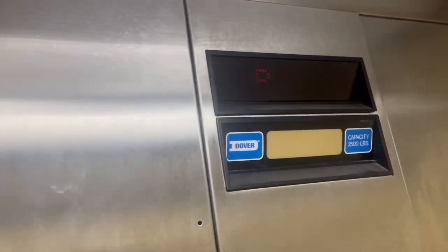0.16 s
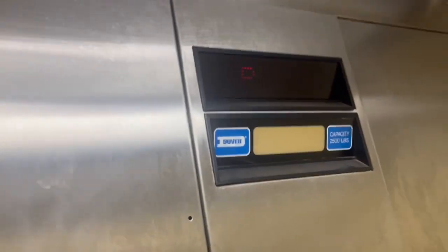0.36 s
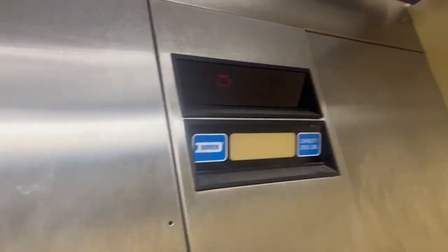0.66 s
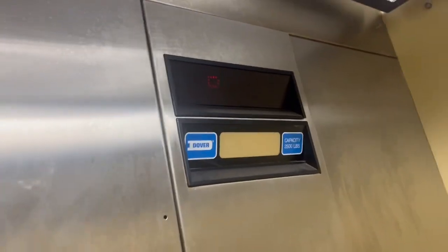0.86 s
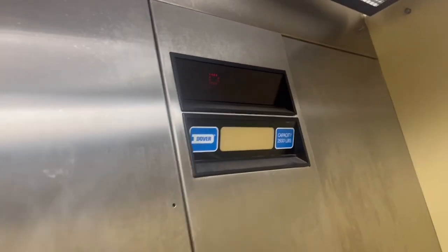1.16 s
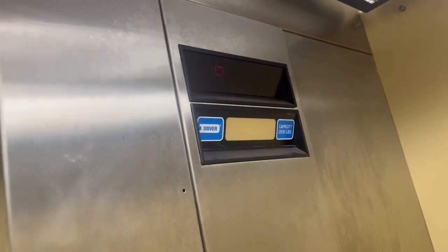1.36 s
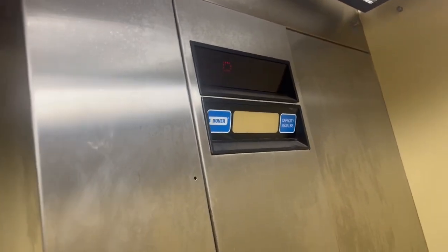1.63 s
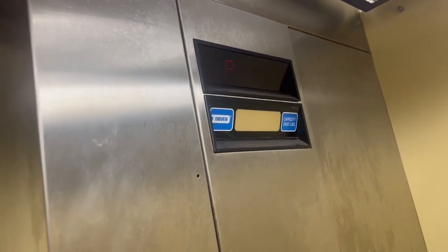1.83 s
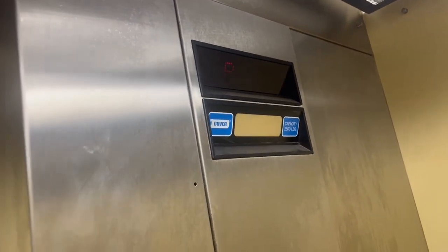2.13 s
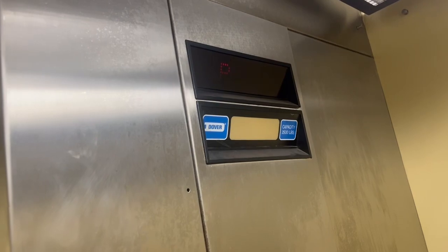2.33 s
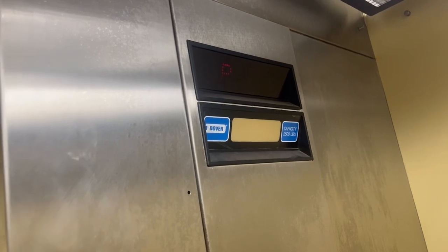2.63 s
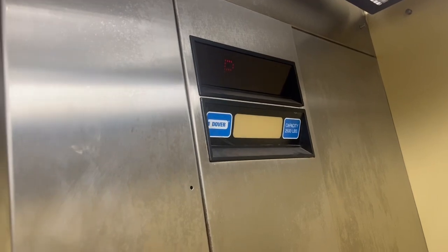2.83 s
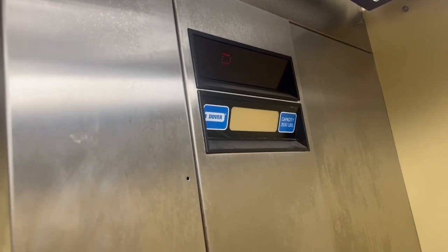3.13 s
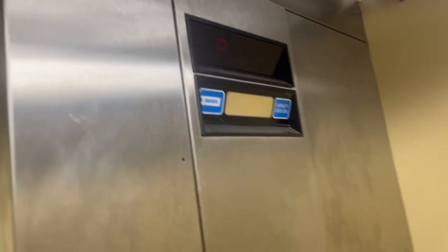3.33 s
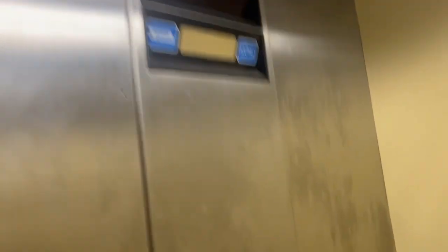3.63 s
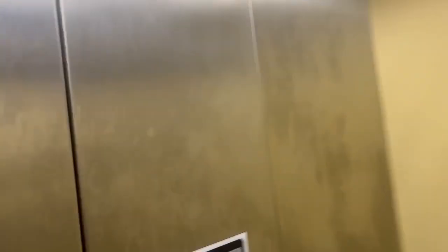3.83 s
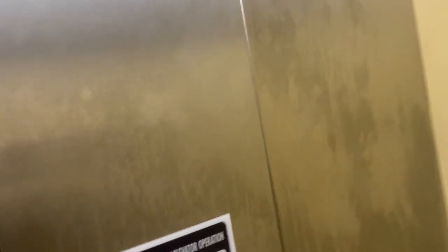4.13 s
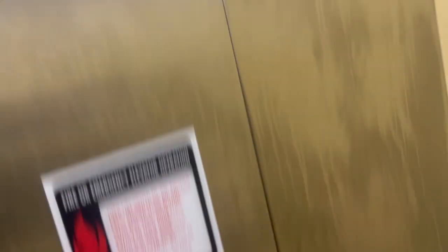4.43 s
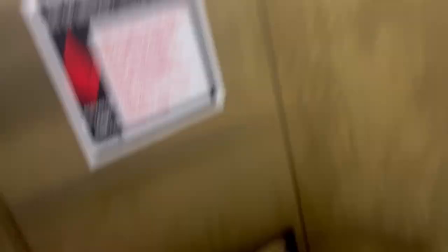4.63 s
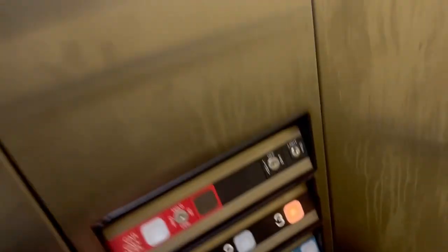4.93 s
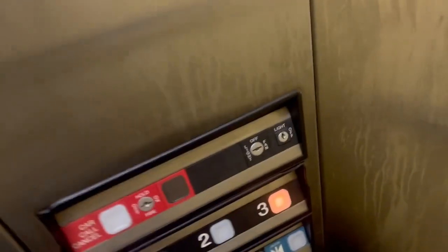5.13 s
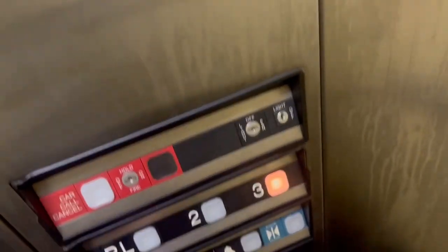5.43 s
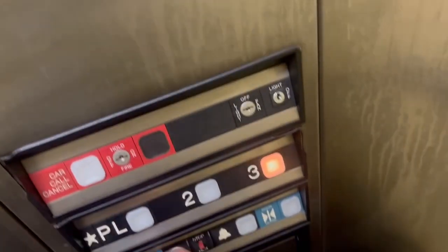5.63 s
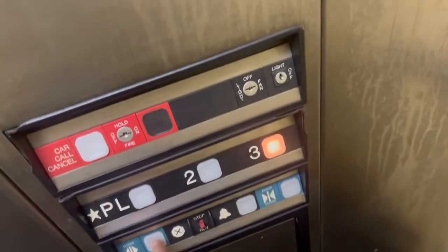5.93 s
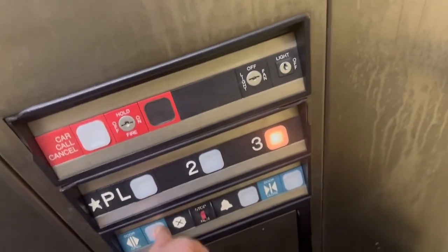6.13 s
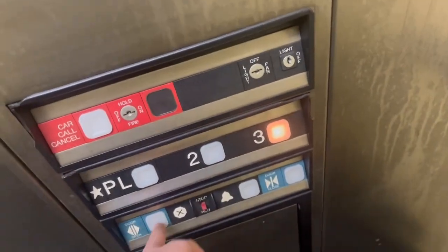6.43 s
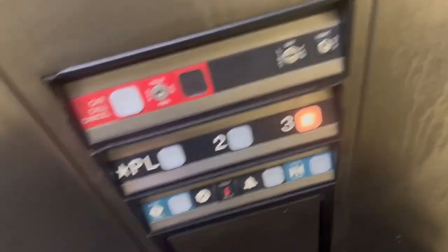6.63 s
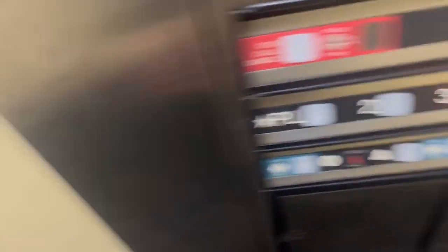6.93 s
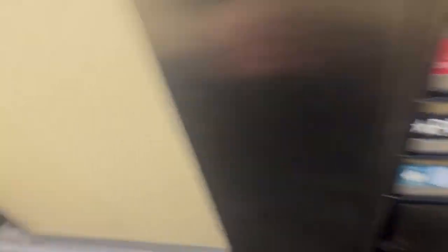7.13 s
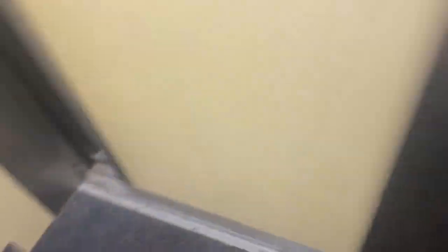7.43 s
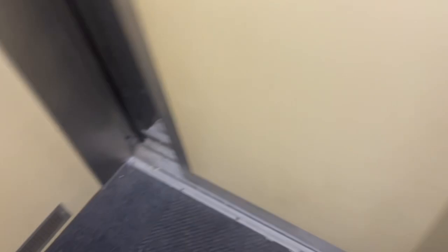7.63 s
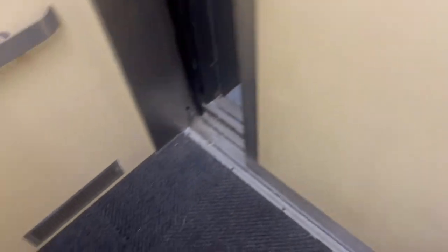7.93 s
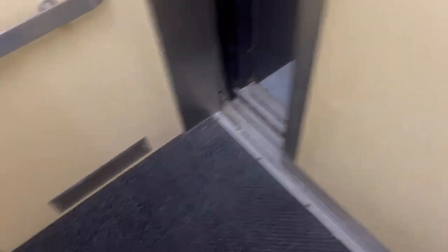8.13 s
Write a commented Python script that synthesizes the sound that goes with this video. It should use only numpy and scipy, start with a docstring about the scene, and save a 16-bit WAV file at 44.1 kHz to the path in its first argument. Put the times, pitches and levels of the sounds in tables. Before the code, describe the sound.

Inside a humming elevator, someone shuffles and steps heavily, then a button clicks and the door jolts and rumbles open.

```python
"""An electric motor hums inside a steel elevator car, on many multiples of its shaft speed, over a bed of
rushing air and low rumble. A passenger carries a microphone through the car's standing waves, so each tone
swells and fades. Soles scuff, steps boom in the floor, sleeves rustle and a button clicks; then the door drive
jolts, groans and rumbles while the rollers rub."""
import sys
import numpy as np
from scipy.fft import rfft, irfft, next_fast_len
from scipy.io import wavfile
from scipy.ndimage import map_coordinates

SR = 44100
rng = np.random.default_rng(int(sys.argv[2]) if len(sys.argv) > 2 else 0)


def generate_wav(sig):
    """Save sig (samples, or channels by samples) to the path in sys.argv[1] as 16-bit PCM at SR."""
    pcm = np.round(np.clip(np.atleast_2d(sig).T, -1, 1) * 32767).astype(np.int16)
    wavfile.write(sys.argv[1], SR, pcm)


N = 364266

# Microphone path: 0 near the display, 1 a step back, 2 lowered, 3 at the buttons, 4 facing the door
# (time [s], place [0-4])
MIC_PATH = [(0, 0), (.75, 0.5), (.95, 1), (3.72, 1), (3.88, 2), (4.3, 2), (4.6, 2.5), (5.1, 3), (6.8, 3),
            (7.15, 3.5), (7.45, 4.5), (8.26, 4)]
# Notches in the treble (frequency [Hz], mid gain [dB], side gain [dB])
TREBLE_NOTCH_EQ = [(6770, 0, 1.5), (7510, -5.5, 6), (7870, -40.5, -9), (8600, -31, -2), (9580, -7, 4),
                   (10500, -5, -10), (11200, -5.5, -31), (13200, -5, -16.5), (14000, -8, -2), (14500, -34, -5),
                   (16000, -34, -2)]
# The microphone's lean to the left (frequency [Hz], left over right [dB])
LEFT_LEAN = [(60, -.5), (150, 0), (400, 1), (1200, 0), (2250, .3), (4100, 5), (7000, 4), (9000, 0),
             (16000, 0)]

# Fader ride on the air bed (time [s], relative level [dB])
AIR_RIDE = [(0.0, -39.5), (1.1, -39.5), (3.4, -39), (4.8, -41), (7, -40.5), (8.26, -40.5)]
# Colour of the air in the centre (frequency [Hz], gain [dB])
AIR_MID_EQ = [(20, 0), (45, 19.5), (80, 16), (130, 6), (250, 7.5), (450, 11.5), (700, 7), (1000, 8.5),
              (1450, 4.5), (1800, -2), (3000, -8.5), (5000, -16), (7000, -29), (12000, -32.5), (16000, -36)]
# Colour of the air's stereo width (frequency [Hz], gain [dB])
AIR_SIDE_EQ = [(20, -26.5), (60, -6.5), (130, -5), (250, 2), (450, 1), (700, 9), (1000, 6), (1450, 5.5),
               (1800, -7), (3000, -11.5), (5000, -18.5), (8000, -33.5), (16000, -32)]
# Car rumble with the microphone high (frequency [Hz], relative level [dB])
RUMBLE_HIGH_EQ = [(20, -19), (45, -6.5), (80, 0), (130, -12.5), (200, -8), (300, -13), (450, -12.5),
                  (700, -38), (1200, -85)]
# Car rumble with the microphone low (frequency [Hz], relative level [dB])
RUMBLE_LOW_EQ = [(20, -18), (45, -1), (80, 1.5), (130, -2), (200, -3), (300, -7.5), (450, -18.5),
                 (700, -27.5), (1200, -84)]
# Weight of the rumble (microphone high [dB], microphone low [dB])
RUMBLE_LEVELS = [-40.5, -38]
# Width of the rumble (frequency [Hz], side against mid [dB])
RUMBLE_WIDTH = [(40, -25), (130, -17.5), (300, -8), (600, -4)]

# Colour of brushing cloth (frequency [Hz], relative level [dB])
CLOTH_EQ = [(700, -36), (2000, 7.5), (4000, 0.5), (7000, -4), (12000, -2.5), (16000, -11.5)]
# Sleeve moves (peak time [s], level [dB], rise [s], fall [s], gain below 8 kHz [dB])
SLEEVE_MOVES = [(.08, -62, 0.11, 0.1, -3), (.295, -46.5, 0.01, 0.036, -4.5), (.53, -59.5, 0.091, .08, -3.5),
                (.77, -51.5, 0.016, 0.031, 0), (1.3, -64.5, 0.33, 0.16, -3), (3.64, -56, 0.065, .08, -2),
                (4.2, -70.5, 0.59, .2, -9), (4.73, -61, 0.034, 0.055, -1), (4.92, -58, .07, 0.087, -2),
                (5.17, -65, 0.04, .04, -8), (5.419, -62, 0.087, 0.14, -4), (5.752, -60, 0.037, .02, -3),
                (6.111, -52.5, .05, 0.04, -2.5), (6.7, -54, 0.18, 0.12, -6), (6.97, -63.5, 0.068, 0.11, 1),
                (8.15, -60, 0.51, 0.25, -5)]
# Colour of a dragging sole (frequency [Hz], relative level [dB])
SOLE_EQ = [(500, -3), (1200, -3), (2000, -6), (4000, -11.5), (7000, -24.5), (12000, -30), (16000, -20)]
# Soles on the mat (start [s], level [dB], rise [s], fall [s])
SOLE_DRAGS = [(0.281, -40, 0.034, 0.053), (0.739, -37.5, 0.047, 0.045)]
# Rubs of sole, door guide and rollers (peak time [s], level [dB], rise and fall [s], pitch [Hz], width [Hz])
RUBS = [(.775, -51, .012, 2880, 120), (.808, -42.5, .011, 2040, 110), (.817, -42, 0.016, 2520, 110),
        (6.19, -57, .2, 1750, 2000), (6.13, -50, .08, 1370, 220), (5.8, -50, .08, 1350, 100),
        (6.15, -56.5, .07, 2050, 300), (6.52, -42, 0.034, 1420, 400), (7.33, -52, .06, 1410, 100),
        (6.45, -60, .15, 2400, 400), (6.9, -58, .1, 2600, 300), (7.1, -58.5, .06, 2350, 190),
        (7.55, -58, 0.2, 2420, 270), (8.05, -57.5, .15, 2400, 300)]
# Weight landing on the floor (time [s], level [dB], pitch [Hz], t60 [s])
FOOTFALLS = [(.362, -21.5, 68.7, 0.22), (.53, -28, 73, 0.26), (.77, -21.5, 74.7, 0.24), (.4, -26, 48, .3),
             (1.95, -33, 50, .25), (2.06, -31.5, 70, .2), (3.785, -16, 71.8, 0.4), (3.8, -29, 168, .25),
             (3.822, -20, 80, .35), (4.97, -28, 54.9, .15)]
# Button and door contacts (time [s], relative level [dB], crack t60 [s])
CONTACTS = [(4.698, -46, 0.061), (5.5029, -44, 0.076), (4.777, -49.5, .02), (5.7503, -46, .01),
            (5.7543, -27, 0.025), (5.7578, -38, .02), (6.12, -37, 0.039), (6.424, -42.5, 0.04)]
# Colour of a click on the steel panel (frequency [Hz], relative level [dB])
PANEL_EQ = [(400, -8), (1000, 8.5), (2500, -1), (5000, -8), (10000, -10.5), (16000, -15.5)]
# Ring of a clicked part (frequency [Hz], relative level [dB], t60 [s])
BUTTON_MODES = [(900, 22, .007), (2500, -6, .07), (3300, 0, 0.035), (6850, -9, .02), (11300, 16, 0.006)]
# Resonances of door and frame (frequency [Hz], width [Hz], relative level [dB])
DOOR_BODY = [(50, 30, -4.5), (98, 32, -0.5), (130.4, 52, 2), (179.4, 59, -2.5), (286.6, 49, -12.5),
             (352, 40, -13), (470, 120, -17)]
# The door takes up its slack and knocks in its track (time [s], level [dB], pitch [Hz], t60 [s])
DOOR_KNOCKS = [(6.045, -21.5, 152.7, .3), (6.055, -21, 210.2, 0.4), (6.115, -24, 214, .45),
               (6.11, -28, 290, .4), (6.045, -25, 285, 0.4), (6.118, -11.5, 132.8, 0.22),
               (6.135, -19, 96.3, 0.27), (6.13, -18, 50, .35), (6.22, -23, 78, 0.46),
               (6.29, -20.5, 94, 0.45), (6.32, -18.5, 52, .45), (6.38, -19.5, 72, 0.35),
               (6.43, -29.5, 276, .3), (6.555, -20, 143, 0.3), (6.66, -21, 75.2, 0.38)]
# A sagging boom after the jolt (time [s], pitch [Hz], level [dB])
GROAN_GLIDE = [(0, 180, -70), (6.16, 180, -70), (6.22, 176, -30), (6.32, 140, -29), (6.42, 124, -28),
               (6.55, 120, -32), (6.7, 118, -70), (8.26, 118, -70)]

# Motor speed, sagging once the door drive runs (time [s], shaft rate [Hz])
SHAFT_SPEED = [(0, 24.17), (6.7, 24.17), (7.3, 24.09), (8.26, 24.05)]
# Core tones of the hum (pitch [x shaft rate])
CORE_MULTIPLES = [2, 3, 4, 5, 6, 8, 9, 12, 15, 16, 22, 24, 44, 28]
# One row per core tone (mid at each of places 0-4 [dB], side held high [dB], side held low [dB])
CORE_LEVELS = [(-42.5, -46, -44, -40, -42, -70, -64), (-33.5, -31, -38, -34, -49.5, -51, -51.5),
               (-40.5, -40.5, -52, -44, -43.5, -57, -54.5), (-53, -45.5, -51.5, -44.5, -42, -55.5, -58),
               (-50, -54.5, -40, -35.0, -38, -62, -59.5), (-46, -46.5, -70, -39, -40.0, -66.5, -75),
               (-42.5, -41, -37.5, -40, -46.5, -59, -52.5), (-53, -56.5, -66, -68, -69, -69, -61),
               (-59, -50.5, -60, -51, -53.5, -71, -72), (-60, -57.5, -65, -58, -53.5, -66.5, -69),
               (-52, -53.5, -49, -65.5, -49, -60.0, -65), (-59, -53.5, -51.5, -67, -51.5, -56.5, -62),
               (-59.5, -57.5, -60, -68, -75, -61, -58), (-57, -67, -56, -70.5, -55.5, -73, -70)]
# Two whines near 1.2 kHz and 435 Hz (pitch [x shaft rate])
WHINE_MULTIPLES = [48.97, 18.03]
# The whines swell with small microphone moves (time [s], upper whine [dB], lower whine [dB])
WHINE_RIDES = [(0.0, -55, -48.5), (0.76, -59, -47.5), (0.96, -45, -58), (1.3, -47.5, -56),
               (1.95, -53.5, -48), (2.23, -48.5, -53.5), (3.38, -49.5, -53.5), (3.62, -56, -52),
               (3.8, -56, -53), (3.93, -49.5, -37.5), (4.07, -50.5, -38), (4.22, -68, -42),
               (4.4, -50.5, -45), (4.62, -49, -48.5), (4.81, -60.5, -53), (5.04, -54, -45),
               (5.45, -61, -53), (6.33, -61, -43.5), (6.76, -61, -60), (7.15, -61, -44), (7.45, -56.5, -42),
               (7.75, -68, -51), (8.1, -54, -46), (8.26, -65, -51)]
# One row per whine (side held high [dB], side held low [dB])
WHINE_WIDTH = [(-59, -52), (-46, -50.5)]
# Three drones near 555, 605 and 650 Hz (pitch [x shaft rate])
DRONE_MULTIPLES = [23, 25, 26.97]
# The drones take turns as the microphone moves (time [s], lower [dB], middle [dB], upper [dB])
DRONE_RIDES = [(0, -61, -51, -53), (.4, -62, -54, -56), (.8, -57, -50.5, -50.5), (1.2, -60, -58, -47),
               (1.7, -55, -63, -48), (2.8, -52, -52, -45), (3.3, -54, -58, -46.5), (3.85, -55, -58, -51),
               (4.3, -51, -49, -48), (4.68, -52, -44.5, -57), (5.3, -45.5, -50, -46),
               (5.8, -48, -48.5, -47.5), (6.5, -53.5, -45, -47.5), (6.95, -61, -53.5, -49.5),
               (7.25, -52, -49, -48.5), (7.6, -53, -52, -59), (7.9, -64, -62, -47), (8.26, -64, -64, -50.5)]
# One row per drone (side held high [dB], side held low [dB])
DRONE_WIDTH = [(-58, -53), (-57, -56.5), (-55, -53.5)]
# Faint tones that fill out the hum (pitch [x shaft rate])
FILL_MULTIPLES = [7, 11, 13, 14, 20, 21, 26, 50]
# One row per faint tone (mid held high [dB], mid held low [dB])
FILL_LEVELS = [(-54, -46.5), (-55, -49.5), (-62.5, -58), (-55.5, -56), (-64, -63), (-59, -61.5),
               (-59, -61.5), (-62, -62.5)]
# Pan of the hum, negative to the right (held high [share of mid], held low [share of mid])
HUM_PAN = [0, -.04]


def amp(db):
    """Decibels to gain."""
    return 10 ** (np.asarray(db) / 20)


def unit(x):
    """Scale to rms 1."""
    return x / np.sqrt(np.mean(x ** 2) + 1e-20)


def eq_gains(points, hz):
    """One gain curve per dB column, drawn on a log frequency axis."""
    knots, *columns = np.transpose(points)
    return amp([np.interp(np.log(hz + 1), np.log(knots + 1), column) for column in columns])


def automation(rows):
    """One value per sample for each column after the time."""
    times, *columns = np.transpose(rows)
    return np.array([np.interp(np.arange(N) / SR, times, column) for column in columns])


def wobble(rate):
    """A smooth random curve with rate knots a second."""
    return map_coordinates(rng.standard_normal(int(N * rate / SR) + 4), [np.arange(N) * rate / SR])


def swell(peak, rise, fall):
    """A bell-shaped envelope around the peak time."""
    t = np.arange(N) / SR - peak
    return np.exp(-.5 * (t / np.where(t < 0, rise, fall)) ** 2)


def bandpass(f, centre, width):
    """Response of two like resonances in series."""
    return (1j * f * width / (centre ** 2 - f ** 2 + 1j * f * width)) ** 2


def filtered(x, response):
    """Shape x by a function of frequency."""
    size = next_fast_len(N + 8192)
    return irfft(rfft(x, size) * response(np.fft.rfftfreq(size, 1 / SR)), size)[..., :N]


def noise(eq):
    """Two unrelated noises of that colour, rms 1."""
    return unit(filtered(rng.standard_normal((2, N)), lambda hz: eq_gains(eq, hz)))


def stereo(mid, side):
    """Mid and side to left and right."""
    return np.array([mid + side, mid - side])


def by_height(high, low):
    """Crossfade from high to low as the microphone is lowered."""
    return high + (low - high) * np.clip(automation(MIC_PATH)[0] - 1, 0, 1)


def air():
    """A bed of rushing air and motor noise, centred in the bass."""
    colour = lambda hz: np.vstack([eq_gains(AIR_MID_EQ, hz), eq_gains(AIR_SIDE_EQ, hz)])
    mid, side = filtered(rng.standard_normal((2, N)), colour)
    return amp(automation(AIR_RIDE)[0] - 1.5 + 1.14 * wobble(3.89)) * stereo(mid, side)


def rumble():
    """The car's lumpy low end, fuller near the floor."""
    high = amp(RUMBLE_LEVELS[0]) * noise(RUMBLE_HIGH_EQ)
    low = amp(RUMBLE_LEVELS[1]) * noise(RUMBLE_LOW_EQ)
    mid, side = by_height(high, low) * amp(1.5 * wobble(7))
    return stereo(mid, filtered(side, lambda hz: eq_gains(RUMBLE_WIDTH, hz)[0]))


def sleeves(rest_db=-69.5):
    """Cloth on cloth: grainy noise that swells with each move."""
    cloth = noise(CLOTH_EQ) * amp(1.1 * wobble(40) + 1.1 * wobble(500))
    dull = filtered(cloth, lambda hz: hz < 8000)
    bright = cloth - dull
    rustle = amp(rest_db) * cloth
    for peak, db, rise, fall, dull_db in SLEEVE_MOVES:
        rustle += amp(db) * swell(peak, rise, fall) * (bright + amp(dull_db) * dull)
    return stereo(rustle[0], .68 * rustle[1])


def scuffs():
    """A sole drags on the mat: bright hiss up front, a duller drag behind it."""
    dull, bright = noise(SOLE_EQ), noise(CLOTH_EQ)
    out = np.zeros((2, N))
    for start, db, rise, fall in SOLE_DRAGS:
        age = np.clip(np.arange(N) / SR - start, 0, None)
        out += amp(db) * dull * swell(start + rise, rise / 2.7, fall) * (age > 0)
        out += amp(db - 13.5) * bright * age / .016 * np.exp(1 - age / .011)
    return stereo(out[0], .54 * out[1])


def squeaks():
    """Sole, door guide and rollers rub: each a swelling band of friction noise."""
    out = np.zeros((2, N))
    for peak, db, fade, hz, width in RUBS:
        rub = unit(filtered(rng.standard_normal((2, N)), lambda f: bandpass(f, hz, width)))
        out += amp(db) * swell(peak, fade, fade) * rub
    return out


def thumps(blows, floor_db, overtone, floor_hz=79.5, floor_t60=1.74):
    """The car booms under each blow and the floor plate rings on."""
    out, t = np.zeros(N + SR), np.arange(SR) / SR
    attack = 1 - np.exp(-t / .006)
    ring = amp(floor_db - 60 * t / floor_t60) * np.sin(2 * np.pi * floor_hz * t)
    for start, db, hz, t60 in blows:
        phase = 2 * np.pi * hz * t
        boom = np.sin(phase) + .21 * np.sin(.86 * phase) + overtone * np.sin(1.5 * phase)
        out[round(start * SR):][:len(t)] += amp(db) * attack * (amp(-60 * t / t60) * boom + ring)
    return stereo(out[:N], .1 * out[:N])


def clicks(snap_t60=.011, tail_t60=.29):
    """A contact snaps, cracks and rings briefly; the steel car answers with a noisy tail."""
    t = np.arange(SR // 3) / SR
    burst, ring = np.zeros((2, N + SR))
    attack = 1 - np.exp(-t / .0005)
    snap, tail = amp(-13.5 - 60 * t / snap_t60), amp(-14.5 - 60 * t / tail_t60)
    for start, db, t60 in CONTACTS:
        span = round(start * SR) + np.arange(len(t))
        crack = amp(-10 - 60 * t / t60)
        burst[span] += amp(db) * attack * (snap + crack + tail)
        for hz, mode_db, mode_t60 in BUTTON_MODES:
            strike_db = db - 13 + mode_db + rng.normal(0, 1.6)
            ring[span] += attack * amp(strike_db - 60 * t / mode_t60) * np.sin(2 * np.pi * hz * t)
    mid, side = noise(PANEL_EQ) * burst[:N]
    return stereo(mid + ring[:N], .78 * side)


def groan():
    """An unsteady tone slides down as the door gets under way."""
    hz, db = automation(GROAN_GLIDE)
    tone = amp(db + 1.5 * wobble(20)) * np.sqrt(2) * np.sin(2 * np.pi * np.cumsum(hz) / SR)
    return stereo(tone, .1 * tone)


def door(start=6.045, attack_s=.03, fall_db_per_s=11):
    """The drive jolts the door, which knocks, groans and shudders in lumps that die away."""
    body = lambda f: sum(amp(db) * bandpass(f, hz, width) for hz, width, db in DOOR_BODY)
    mid, side = unit(filtered(rng.standard_normal((2, N)), body))
    age = np.clip(np.arange(N) / SR - start, 0, None)
    attack = 1 - np.exp(-age / attack_s)
    shudder = attack * amp(-25.5 - fall_db_per_s * age + 1.5 * wobble(14))
    knocks = thumps(DOOR_KNOCKS, floor_db=-22, overtone=.092)
    return shudder * stereo(mid, .24 * side) + knocks + groan()


def motor_hum(drift_rad=.2):
    """Sines on multiples of the shaft rate, as loud as the standing waves make them at each place."""
    shaft_angle = 2 * np.pi * np.cumsum(automation(SHAFT_SPEED)[0]) / SR
    place = automation(MIC_PATH)[0]
    # Each voice holds its mid level and its pair of side levels.
    core = [(np.interp(place, range(5), row[:5]), row[5:]) for row in CORE_LEVELS]
    whines = zip(automation(WHINE_RIDES), WHINE_WIDTH)
    drones = zip(automation(DRONE_RIDES), DRONE_WIDTH)
    fill = [(by_height(high, low), (high - 14, low - 11.5)) for high, low in FILL_LEVELS]
    multiples = CORE_MULTIPLES + WHINE_MULTIPLES + DRONE_MULTIPLES + FILL_MULTIPLES
    mid, side = np.zeros((2, N))
    for multiple, (mid_db, side_levels) in zip(multiples, [*core, *whines, *drones, *fill]):
        phase = multiple * shaft_angle + rng.uniform(0, 2 * np.pi) + drift_rad * wobble(5)
        flutter_db = (.4 + .018 * multiple) * wobble(9)  # higher tones flutter more
        mid += amp(mid_db + flutter_db) * np.sqrt(2) * np.sin(phase)
        side_db = by_height(*side_levels) + 2.3 * wobble(1.2)
        side += amp(side_db) * np.sqrt(2) * np.cos(phase + .3 * wobble(.72))
    return stereo(mid, side + by_height(*HUM_PAN) * mid)


def scene():
    """The motor and its bed, with the foley and the door on top."""
    car = motor_hum() + rumble() + air()
    foley = sleeves() + scuffs() + squeaks() + thumps(FOOTFALLS, floor_db=-9, overtone=.15) + clicks()
    return car + foley + door()


def record(dry):
    """The treble gets its notches, the sound leans left, and the treble ends at 15.7 kHz."""
    mid_side = np.array([dry[0] + dry[1], dry[0] - dry[1]]) / 2
    coloured = stereo(*filtered(mid_side, lambda hz: eq_gains(TREBLE_NOTCH_EQ, hz)))
    lean_split = np.array([[.5], [-.5]])  # half the dB up on the left, half down on the right
    return filtered(coloured, lambda hz: eq_gains(LEFT_LEAN, hz) ** lean_split * (hz < 15700))


dry = scene()
out = record(dry)
generate_wav(out)
```